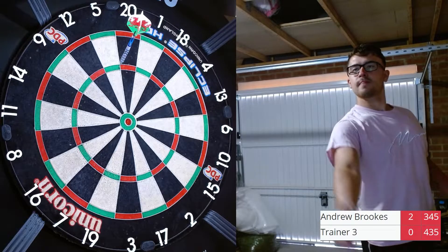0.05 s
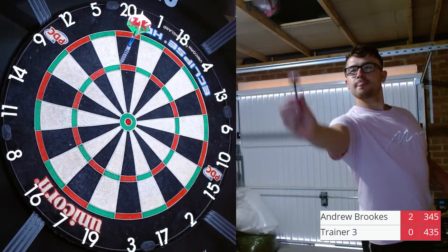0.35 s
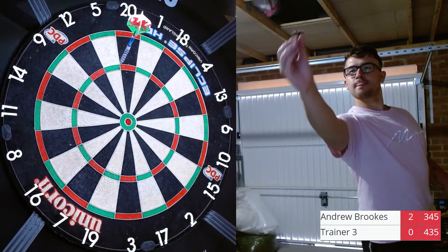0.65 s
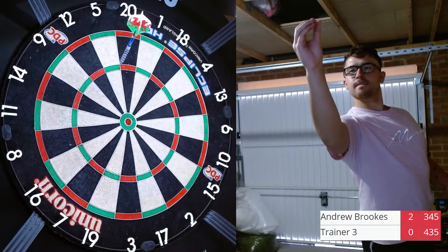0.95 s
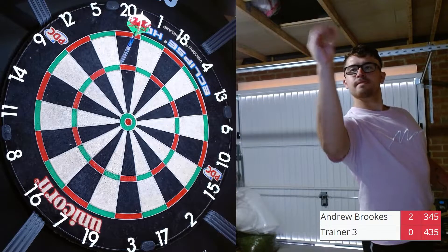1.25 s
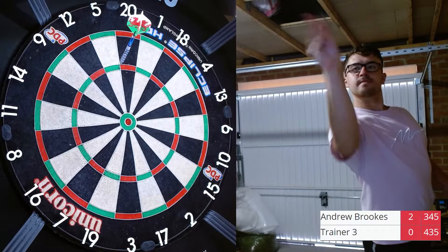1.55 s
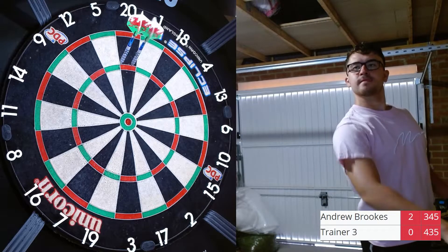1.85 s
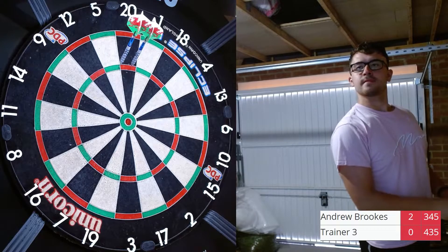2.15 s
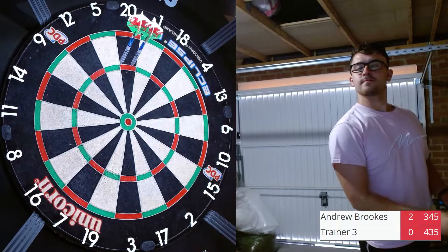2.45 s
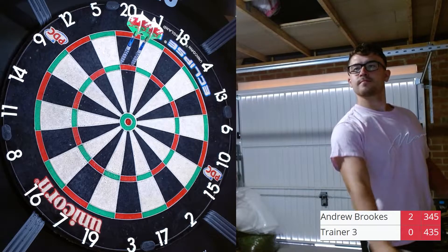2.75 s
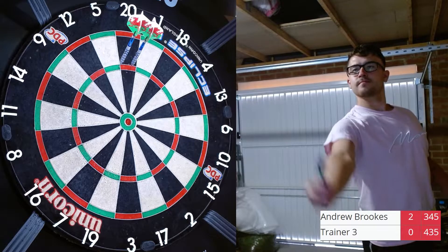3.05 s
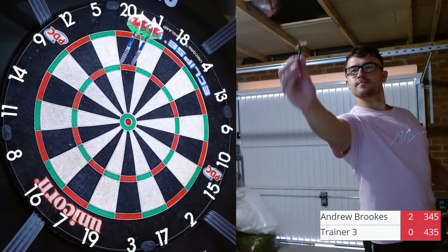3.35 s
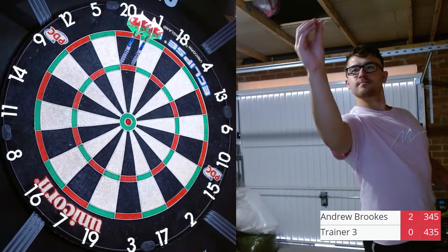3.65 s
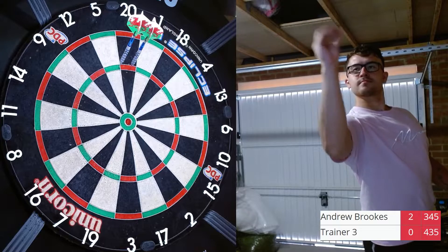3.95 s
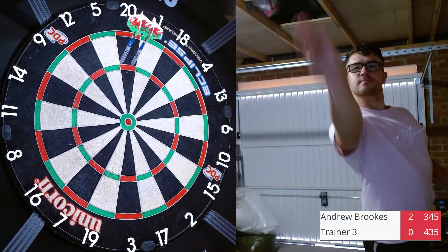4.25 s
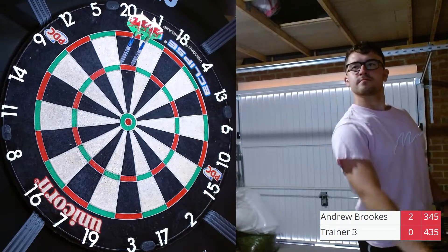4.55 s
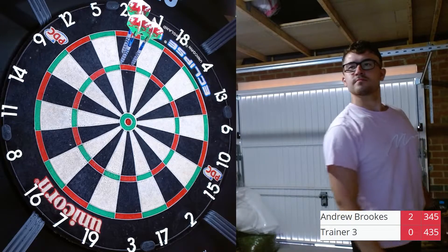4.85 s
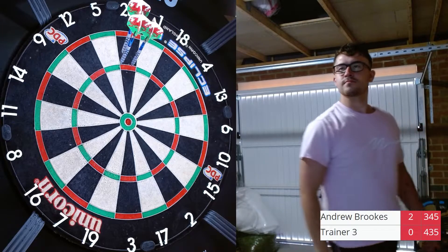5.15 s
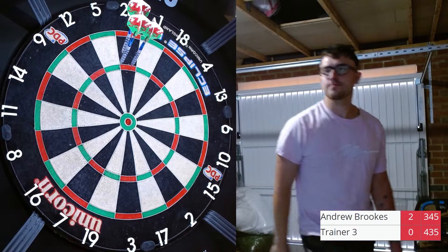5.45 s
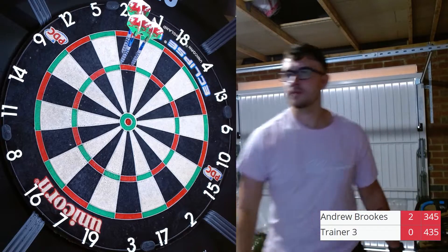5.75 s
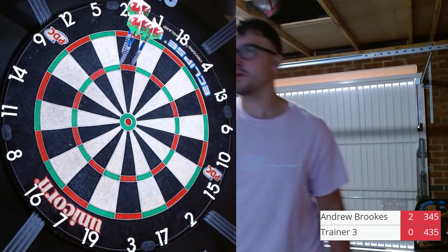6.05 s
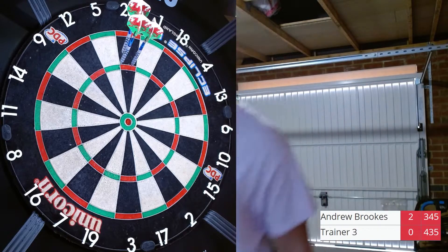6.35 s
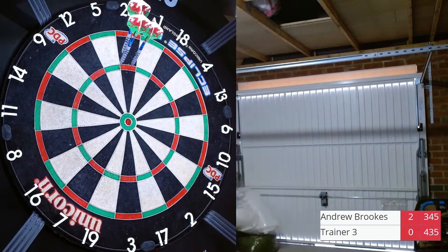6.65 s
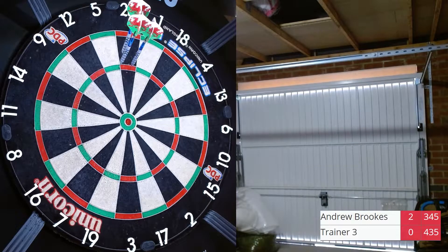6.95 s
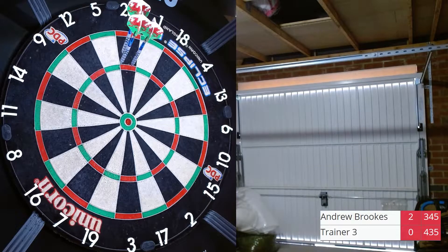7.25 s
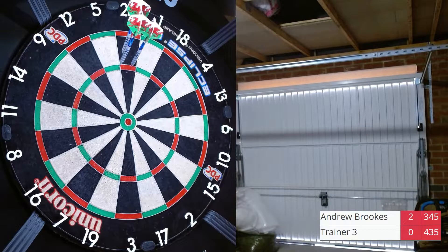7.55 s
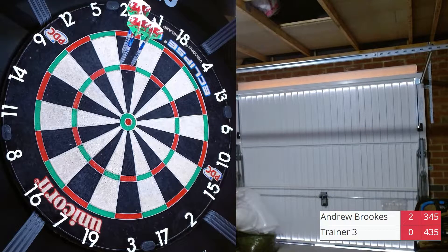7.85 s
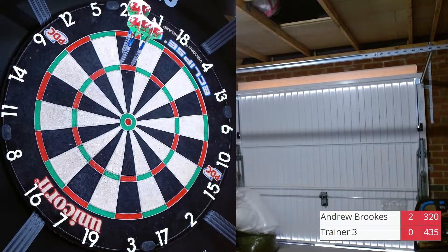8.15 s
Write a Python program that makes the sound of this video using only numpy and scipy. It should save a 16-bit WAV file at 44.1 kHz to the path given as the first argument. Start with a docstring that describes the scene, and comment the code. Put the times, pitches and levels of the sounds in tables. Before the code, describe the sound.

Two close dart hits ring briefly through a garage, followed by quiet, gritty footsteps and a light rustle of clothes.

```python
"""Two darts thud into a bristle dartboard close by, and each sets the board and the garage ringing.
A dart ticks faintly as it leaves the fingers; its point pushes into the board and stops dead,
and the second one clacks against those already there. The thrower then walks up over the gritty floor,
heels knocking, soles scuffing, clothes rustling, above a low room rumble."""
import sys
import numpy as np
from scipy import signal
from scipy.fft import rfft, irfft
from scipy.io import wavfile

SR = 44100
rng = np.random.default_rng(int(sys.argv[2]) if len(sys.argv) > 2 else 0)


def output_pcm(signal):
    """Save a mono or channel-first signal as 16-bit PCM at the path in sys.argv[1].

    Samples are clipped to [-1, 1] before scaling.
    """
    pcm = np.clip(np.atleast_2d(signal).T, -1, 1) * 32767
    wavfile.write(sys.argv[1], SR, np.round(pcm).astype(np.int16))


N = 366030
TIME = np.arange(N) / SR
AGE = np.arange(SR) / SR   # seconds since a hit
CUTOFF_HZ = 7850   # top of the microphone's range

# dart hits: landing t/s, level/dB, brightness/(dB per octave), flight/s, release tick/dB
THROWS = [(1.7978, 0, -.2, .3516, 2), (4.513, .9, .3, .3582, -1)]
# steps: t/s, heel/dB, floor knock/dB, ball/dB, sole ring f/Hz, ring/dB,
# roll/s, scuff/dB, rasp f/Hz, rasp/dB
STEPS = [(4.971, -35.5, -52, -40, 900, -20, 0.22, -51, 1190, -15),
         (5.19, -45, -42.5, -52, 450, 4, 0.033, -49.5, 1400, -42),
         (5.662, -33.5, -44.5, -32, 900, 5, 0.15, -50, 2040, -9),
         (6.339, -31, -35.5, -37.5, 316, 1.5, 0.11, -48, 1840, -3.5),
         (7.051, -36, -41.5, -39, 400, -2, .13, -49, 1580, -6.5),
         (7.592, -46, -64, -58, 600, 4, 0.0046, -49.5, 1900, -10)]
# stereo image of diffuse sound: f/Hz, left-right correlation
DIFFUSE_IMAGE = [(100, 1), (300, 1), (600, 0.97), (1000, 0.75), (2000, -0.15), (4000, -0.18), (7000, 1)]


def from_db(db):
    """Decibels to gain."""
    return 10 ** (np.asarray(db) / 20)


def at_hz(points, hz):
    """Read a table on a log-frequency axis."""
    f, value = np.transpose(points)
    return np.interp(np.log(np.maximum(hz, 1)), np.log(f), value)


def add(out, s, sound):
    """Mix a sound in at time s."""
    start = int(round(s * SR))
    out[:, start:start + sound.shape[-1]] += sound[..., :N - start]


def noise(colour, image, size):
    """Stereo noise of a given colour and left-right correlation; rms 1."""
    hz = np.arange(size // 2 + 1) * SR / size
    mid, side = rfft(rng.standard_normal((2, size)))
    alike = np.clip(at_hz(image, hz), -.99, .99)
    pair = np.sqrt(1 + alike) * mid + np.sqrt(1 - alike) * side * np.array([[1], [-1]])
    x = irfft(pair * from_db(at_hz(colour, hz)) * (hz > 12) * (hz < 9000), size)
    return x / np.sqrt(np.mean(x ** 2))


def resonate(x, hz, width_hz):
    """One resonance with gain 1 at its peak."""
    r = np.exp(-np.pi * width_hz / SR)
    feedback = [1, -2 * r * np.cos(2 * np.pi * hz / SR), r * r]
    return signal.lfilter(np.array([1, 0, -1]) * (1 - r * r) / 2, feedback, x)


def decay(t60):
    """Envelope that loses 60 dB in t60 seconds."""
    return np.exp(-np.log(1000) * AGE / t60)


def swell(s, half_s):
    """A smooth rise and fall around time s, of height 1."""
    return np.exp(-((TIME - s) / half_s) ** 2)


def ring(hz, db, t60, phase=0):
    """One struck mode."""
    return from_db(db) * decay(t60) * np.sin(2 * np.pi * hz * AGE + phase)


def crack(t60):
    """A very short burst of bright noise, of peak 1."""
    # colour of a hard contact: f/Hz, level/dB
    colour = [(500, 1.5), (1500, -3.5), (2500, 4), (4000, 2), (5500, -0.5), (7000, -7.5), (8500, -8)]
    burst = noise(colour, DIFFUSE_IMAGE, SR) * decay(t60)
    return burst / np.abs(burst).max()


def garage_tail(colour, build_s):
    """Reflections pile up, then each octave dies at its own rate; energy 1 per channel on average."""
    # reverb time of the garage: f/Hz, t60/s
    reverb_times = [(80, 0.42), (250, 0.4), (600, 0.47), (1500, 0.39), (4000, 0.44), (8000, .36)]
    hz = np.arange(SR // 2 + 1)
    wash = rfft(noise([(100, 0), (8000, 0)], DIFFUSE_IMAGE, SR)) * from_db(at_hz(colour, hz))
    octaves = np.geomspace(62.5, 8000, 8)
    tail = np.zeros((2, SR))
    for centre, pick in zip(octaves, np.eye(len(octaves))):
        band = irfft(wash * at_hz(np.c_[octaves, pick], hz), SR)
        tail += band * decay(at_hz(reverb_times, centre))
    tail *= 1 - np.exp(-AGE / build_s)
    return tail / np.sqrt(np.sum(tail ** 2) / 2)


def room_response():
    """The garage's echoes from one spot, near unit gain across the microphone's range."""
    return garage_tail([(100, 0), (8000, 0)], build_s=.003) * np.sqrt(2 * CUTOFF_HZ / SR)


def with_room(x, room, room_db, direct_db=0):
    """The direct sound plus what the walls return."""
    wet = signal.fftconvolve(x, room, axes=-1)[:, :x.shape[-1]]
    return from_db(direct_db) * x + from_db(room_db) * wet


def room_tone(air_db=-52):
    """A steady bed of rumble, hiss and electrical hum, with faint far tones that swell and fade."""
    # rumble and hiss: f/Hz, level/dB
    air_colour = [(12, -22), (20, 1.5), (40, -0.5), (87, -11.5), (117, -10), (147, -14.5), (175, -15),
                  (306, -20.5), (365, -18.5), (520, -24.5), (575, -23.5), (722, -25.5), (779, -26),
                  (7180, -48.5), (8360, -49), (10900, -85.5), (18400, -120)]
    # their stereo image: f/Hz, left-right correlation
    air_image = [(100, 0.81), (400, 0.54), (1000, 0.37), (2000, 0.025), (7000, .2)]
    # electrical tones: f/Hz, rms level/dB
    hum_tones = [(118, -67), (4000, -94), (4371, -93.5)]
    # far tones: peak t/s, half length/s, f/Hz, level/dB
    far_tones = [(2.525, 0.47, 574, -66.5), (3.939, .4, 368, -64)]
    hum = sum(from_db(db) * np.sqrt(2) * np.sin(2 * np.pi * (hz * TIME + rng.random()))
              for hz, db in hum_tones)
    far = sum(from_db(db) * swell(s, half_s) * np.sin(2 * np.pi * hz * TIME)
              for s, half_s, hz, db in far_tones)
    return from_db(air_db) * noise(air_colour, air_image, N) + hum + far


def clothes(cloth_db=-58.5, swing_db=-4.5, swing_after_s=.25, swing_half_s=.097):
    """Cloth rubs as the arm lifts, then swishes with each stride, loudest passing the microphone."""
    # cloth rustle: f/Hz, level/dB
    colour = [(150, -2.5), (500, -1), (1000, -4), (1400, -3.5), (2200, -7.5), (3300, -11), (7000, -20),
              (8500, -36)]
    # sleeve of the throwing arm: t/s, level/dB
    arm_lifts = [(.1, -66.5), (2.95, -73)]
    pass_s, nearest_m, walk_m_per_s = 6.295, .38, .87
    outside_walk_s = TIME - np.clip(TIME, STEPS[0][0], STEPS[-1][0])
    walking = np.exp(-(outside_walk_s / swing_half_s) ** 2)
    nearness = nearest_m / np.hypot(nearest_m, walk_m_per_s * (TIME - pass_s))
    strides = 1 + from_db(swing_db) * sum(swell(s + swing_after_s, swing_half_s) for s, *_ in STEPS)
    sleeve = sum(from_db(db) * swell(s, half_s=.29) for s, db in arm_lifts)
    return (from_db(cloth_db) * walking * nearness * strides + sleeve) * noise(colour, DIFFUSE_IMAGE, N)


def grit(room, top_hz=4000):
    """Single grains crack as the weight rolls over them."""
    # grains under a sole: t/s, level/dB
    pops = [(4.973, -42), (5.775, -28), (6.4523, -43), (7.1025, -46), (7.1302, -32), (7.594, -39)]
    out = np.zeros((2, N))
    soften = signal.butter(1, top_hz, fs=SR, output="sos")
    for s, db in pops:
        pop = signal.sosfilt(soften, from_db(db) * crack(t60=.0031))
        add(out, s, with_room(pop, room, room_db=6))
    return out


def scuffs(room, grains_per_s=1000, grain_spread_db=5.5, rise_share=.64, fall_s=.027):
    """Grit crunches under the sole, most at the end of its roll; each step rasps at its own pitch."""
    # sole sliding on grit: f/Hz, level/dB
    colour = [(150, -1.5), (500, 8), (1000, -0.5), (1700, 2.5), (2500, -5), (3500, -5), (5000, -10),
              (7000, -16), (8500, -46)]
    out = np.zeros((2, N))
    for s, *_, roll_s, db, rasp_hz, rasp_db in STEPS:
        breaks = rng.random(SR) < grains_per_s / SR
        grains = breaks * from_db(grain_spread_db * np.minimum(rng.exponential(1, SR), 4))
        crunch = signal.fftconvolve(grains ** 2, decay(.003))[:SR].clip(0) ** .5
        slide = noise(colour, DIFFUSE_IMAGE, SR) * crunch / np.sqrt(np.mean(crunch ** 2))
        rasp = resonate(slide, rasp_hz, width_hz=550)
        past_peak_s = AGE - roll_s
        stroke = np.exp(np.minimum(past_peak_s / (rise_share * roll_s), -past_peak_s / fall_s))
        add(out, s, from_db(db) * stroke * (slide + from_db(rasp_db) * rasp / rasp.std()))
    return with_room(out, room, room_db=2, direct_db=-3)


def footfalls(heel_top_hz=1400, ball_band_hz=(450, 2200), ball_after_s=.039):
    """The soft heel lands with a dull, hollow slap and a low knock; the ball follows, brighter."""
    # knock of a heel on the floor: f/Hz, level/dB, t60/s
    knock_modes = [(111.5, 1, 0.27), (133.4, -2, 0.48), (195.6, 4, 0.098), (290, -5.5, 0.19)]
    # slap of the shoe: f/Hz, level/dB
    colour = [(80, 5.5), (200, 20.5), (400, -3.5), (700, 1), (1300, 3), (2000, -5), (3000, 0),
              (8000, -34.5)]
    out = np.zeros((2, N))
    knock = sum(ring(hz, db, t60) for hz, db, t60 in knock_modes) / 2
    heel = signal.butter(4, heel_top_hz, fs=SR, output="sos")
    ball = signal.butter(3, ball_band_hz, "band", fs=SR, output="sos")
    for s, heel_db, knock_db, ball_db, sole_hz, sole_db, *_ in STEPS:
        add(out, s, from_db(knock_db) * knock)
        for lands_s, db, softness in [(s, heel_db, heel), (s + ball_after_s, ball_db, ball)]:
            contact = noise(colour, DIFFUSE_IMAGE, SR) * decay(t60=.023)
            hollow = from_db(sole_db) * resonate(contact, sole_hz, width_hz=600)
            slap = from_db(db) * signal.sosfilt(softness, contact + hollow)
            # each spot on the floor has its own echoes
            add(out, lands_s, with_room(slap, room_response(), room_db=2, direct_db=-4))
    return out


def releases(room, level_db=-39):
    """Each dart ticks against the fingers as it leaves, one flight time before it lands."""
    out = np.zeros((2, N))
    for s, _, _, flight_s, tick_db in THROWS:
        tick = from_db(level_db + tick_db) * crack(t60=.0021)
        add(out, s - flight_s, with_room(tick, room, room_db=.5))
    return out


def clacks(room):
    """Points, barrels and flights touch: a crack and a short metallic ring."""
    # a dart striking the board and the darts in it: t/s, level/dB, ring f/Hz, ring/dB
    contacts = [(1.7902, -27.5, 5100, -6), (1.7967, -20, 4890, -11.5), (1.799, -29.5, 1780, 9),
                (4.5092, -40.5, 1970, -18), (4.5215, -18, 5870, -20), (4.5235, -18, 6800, -16.5)]
    out = np.zeros((2, N))
    for s, db, hz, ring_db in contacts:
        clack = from_db(db) * (crack(t60=.012) + ring(hz, ring_db, t60=.0095))
        add(out, s, with_room(clack, room, room_db=4))
    return out


def thuds(push_s=.0055, push_db=-24.5, wash_db=8, wash_delay_s=.004, right_lag_s=.00008):
    """The point sinks in and pushes the board, then stops dead: board, dart and garage ring."""
    # board on its mount: f/Hz, level/dB, t60/s
    board_modes = [(162, -14, .08), (447, -10.5, .034), (585, -6, .023), (818, -6, .018), (1375, -23, .012),
                   (1634, -22, .05), (1880, -31, .04)]
    # barrel and shaft: f/Hz, level/dB, t60/s
    dart_modes = [(3500, -61, .3), (4000, -55, .28), (4680, -54, .28), (5660, -58, .25), (6450, -55, .28)]
    # standing waves of the garage and its fittings: f/Hz, level/dB, t60/s
    room_modes = [(59.3, -27.5, 0.95), (74.1, -26.2, 0.49), (84.0, -24.0, 0.26), (102.2, -34.4, 0.34),
                  (130.4, -22.9, 0.26), (173.3, -24.3, 0.3), (202.4, -26.0, 0.23), (246.5, -25.9, 0.31),
                  (272.4, -25.8, 0.22), (402.3, -19.7, 0.3), (419.1, -31.8, 0.49), (439.2, -33.6, 0.49),
                  (457.6, -32.5, 0.51), (496.9, -23.0, 0.28), (567.5, -35.7, 0.41), (590.4, -30.3, 0.45),
                  (618.8, -21.8, 0.34), (637.2, -39.0, 0.54), (690.9, -28.5, 0.38), (761.6, -41.0, 0.54),
                  (794.5, -22.3, 0.29), (820.3, -33.7, 0.46), (836.7, -36.4, 0.4), (879.1, -31.2, 0.48),
                  (909.9, -28.6, 0.25), (983.7, -36.1, 0.51), (1027.6, -28.5, 0.28), (1092.8, -29.0, 0.24),
                  (1261.8, -31.7, 0.3), (1555.8, -35.0, 0.22)]
    # first reflections off the wall behind the board and a nearby surface: delay/s, level/dB
    reflections = [(.00146, -.2), (.0041, -5.5)]
    # scattered sound of a thud: f/Hz, level/dB
    wash_colour = [(40, -0.5), (150, -3.5), (210, 0.5), (330, -6.5), (430, 6.5), (600, -3.5), (720, -2),
                   (840, 2), (1000, -3.5), (1400, -8.5), (1850, -10.5), (2400, -18), (4000, -40.5),
                   (8000, -38.5)]
    out = np.zeros((2, N))
    wash = garage_tail(wash_colour, build_s=.0011)
    board_attack = 1 - np.exp(-AGE / .0007)
    room_attack = 1 - np.exp(-(AGE / .016) ** 2)
    # the shorter the wave, the more its phase differs between the two microphone ports
    rad_per_hz = rng.choice([-1, 1], len(room_modes))[:, None, None] * np.array([[1], [-1]]) / 1300
    push = from_db(push_db) * np.sin(np.pi * np.minimum(AGE / push_s, 1) ** 2)
    dart = sum(ring(hz, level, t60, rng.uniform(0, 2 * np.pi, (2, 1))) for hz, level, t60 in dart_modes)
    for s, db, brightness, *_ in THROWS:
        tilt_db = lambda hz: brightness * np.log2(hz / 500)
        board = -board_attack * sum(ring(hz, level + tilt_db(hz), t60) for hz, level, t60 in board_modes)
        stereo_board = np.array([board, np.interp(AGE - right_lag_s, AGE, board)])
        for delay_s, path_db in [(0, 0), *reflections]:
            add(out, s + delay_s - push_s, from_db(db + path_db) * push)
            add(out, s + delay_s, from_db(db + path_db) * stereo_board)
        waves = sum((-1) ** k * ring(hz, level + tilt_db(hz), t60, rad_per_hz[k] * hz)
                    for k, (hz, level, t60) in enumerate(room_modes))
        add(out, s, from_db(db) * (waves * room_attack + dart))
        add(out, s + wash_delay_s, from_db(db + wash_db) * wash)
    return out


def scene():
    """Darts at the board and the thrower on the floor, in one garage."""
    thrower_room = room_response()
    darts = thuds() + clacks(room_response()) + releases(thrower_room)
    thrower = footfalls() + scuffs(thrower_room) + grit(thrower_room) + clothes()
    return darts + thrower + room_tone()


def record(dry, left_lead_db=.9, bass_hz=250):
    """A narrow-band microphone: the left port hears more above the bass, and the top is cut steeply."""
    upper = signal.sosfilt(signal.butter(1, bass_hz, "high", fs=SR, output="sos"), dry)
    ports = dry + upper * (from_db([[left_lead_db], [-left_lead_db]]) - 1)
    return signal.sosfilt(signal.butter(20, CUTOFF_HZ, fs=SR, output="sos"), ports)


dry = scene()
out = record(dry)
output_pcm(out)
```